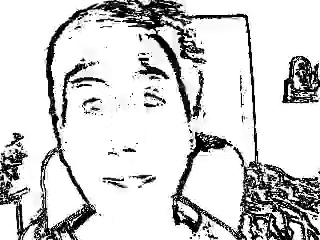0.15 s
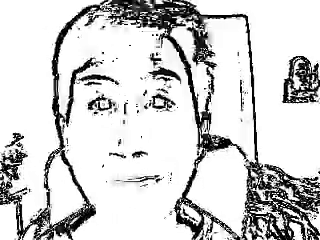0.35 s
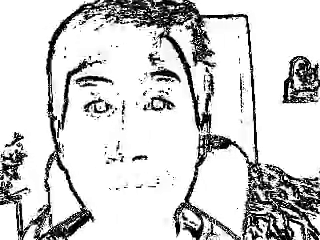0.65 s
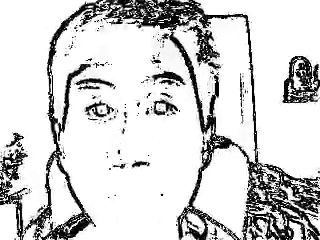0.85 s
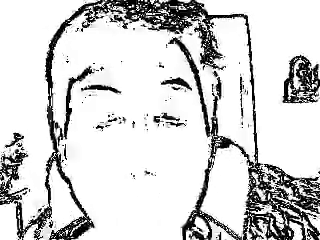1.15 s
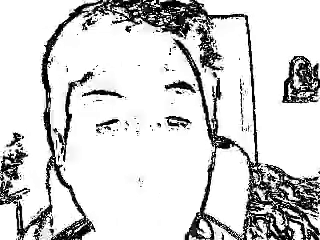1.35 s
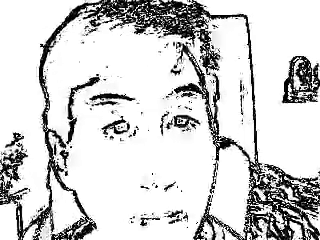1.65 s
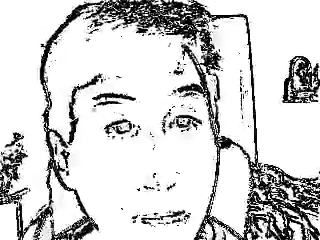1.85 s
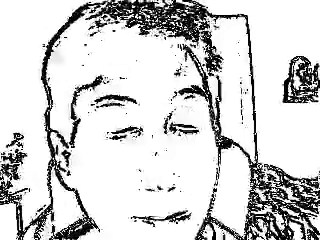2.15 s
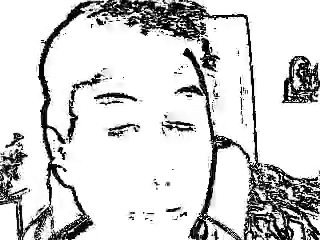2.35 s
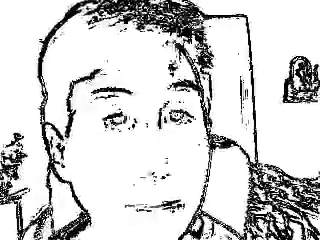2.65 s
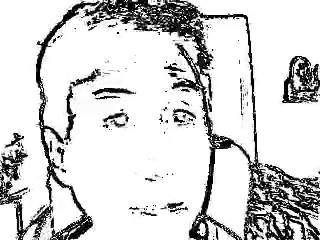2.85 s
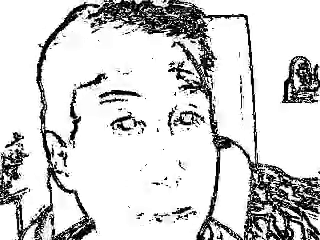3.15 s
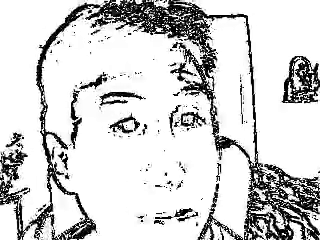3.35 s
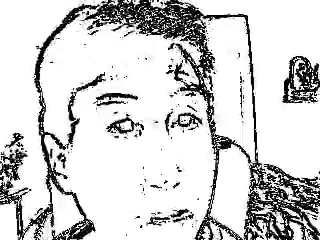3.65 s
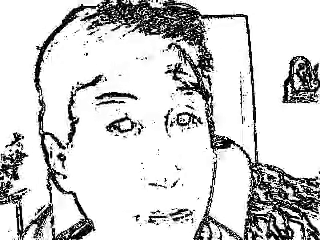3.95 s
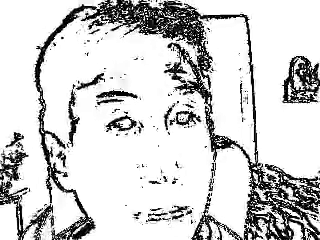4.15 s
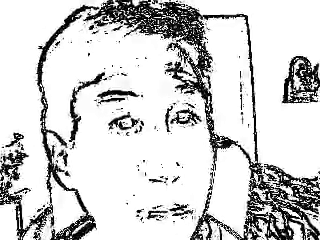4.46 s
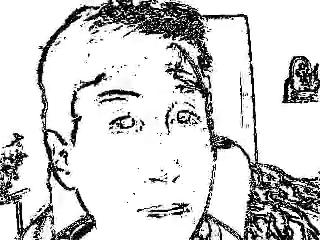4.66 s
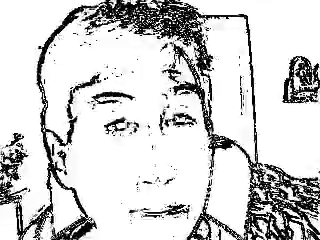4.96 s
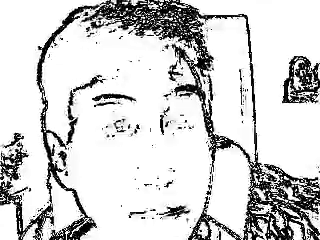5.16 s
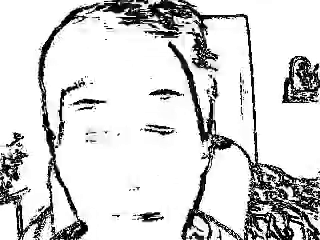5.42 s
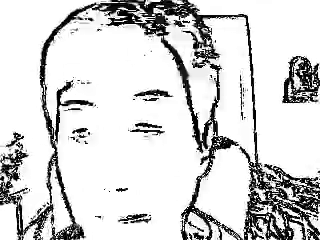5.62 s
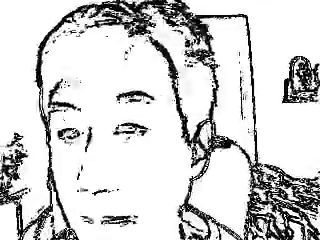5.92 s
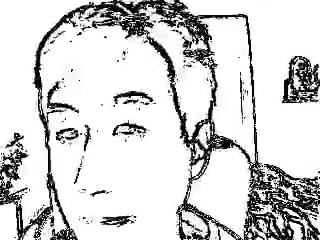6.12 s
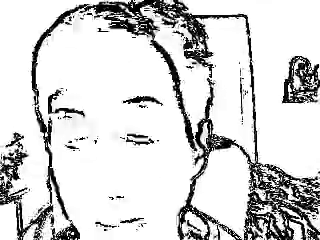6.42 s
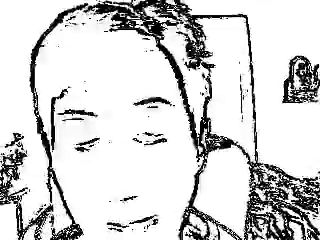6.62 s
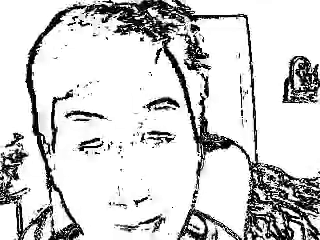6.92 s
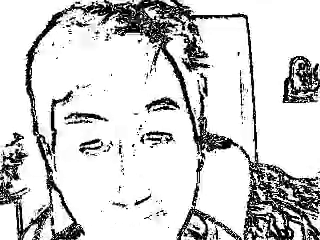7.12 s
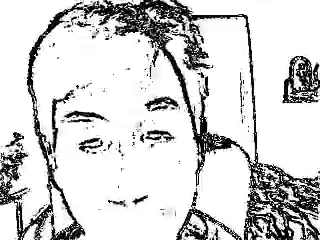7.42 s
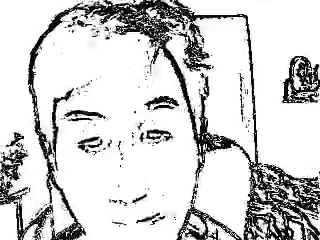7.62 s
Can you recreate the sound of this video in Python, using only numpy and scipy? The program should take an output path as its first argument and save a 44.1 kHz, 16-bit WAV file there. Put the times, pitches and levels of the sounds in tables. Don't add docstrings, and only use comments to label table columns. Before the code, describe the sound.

A computer's small fan hums deep and steady, almost a pure low tone, with a thin constant whine above it and soft air rushing through vents. Faint cloth rubs and tiny taps open the scene; a hard dry knock comes soon after, a hollow snap later, and a thin click near the end. Quiet small room, heard very close through the computer's own slightly dull microphone.

```python
import sys
import numpy as np
from scipy import signal
from scipy.fft import rfft, irfft, next_fast_len
from scipy.io import wavfile

SR = 44100
rng = np.random.default_rng(int(sys.argv[2]) if len(sys.argv) > 2 else 0)


def invert_db(level):
    return 10 ** (np.asarray(level, dtype=float) / 20)


def to_wav(s):
    ch = np.atleast_2d(s).T
    pcm = np.round(np.clip(ch, -1, 1) * 32767)
    wavfile.write(sys.argv[1], SR, pcm.astype(np.int16))


N = 343274
TIME_S = np.arange(N) / SR
SIZE = next_fast_len(N)
HZ = np.fft.rfftfreq(SIZE, 1 / SR)


def evened(x):
    return x / np.sqrt(np.mean(x ** 2) + 1e-20)


def along(rows):
    s, value = np.transpose(rows)
    return np.interp(TIME_S, s, value)


def across(points):
    hz, value = np.transpose(points)
    return np.interp(np.log(HZ + 1), np.log(hz + 1), value)


def wander(top_hz):
    count, rate_hz = 2048, 200
    steps = rng.standard_normal(count)
    hz = np.fft.rfftfreq(count, 1 / rate_hz)
    smoothing = (hz > 0) / (1 + (hz / top_hz) ** 2)
    slow = evened(irfft(rfft(steps) * smoothing))
    return np.interp(TIME_S, np.arange(count) / rate_hz, slow)


def coloured(db_per_hz):
    white = rfft(rng.standard_normal(SIZE))
    return irfft(white * invert_db(db_per_hz) * np.sqrt(SR / 2), SIZE)[:N]


def add(mix, start_s, sound):
    part = mix[round(start_s * SR):][:len(sound)]
    part += sound[:len(part)]


def tone(turns, level_db):
    return np.sqrt(2) * invert_db(level_db) * np.sin(2 * np.pi * turns)


def overtones(turns, orders, waver_hz):
    out = np.zeros(N)
    for multiple, level_db, waver_db in orders:
        phase = round(multiple) * turns + rng.random()
        out += tone(phase, level_db + waver_db * wander(waver_hz))
    return out


# time_s, speed_hz (turns a second)
FAN_SPEED = [(0, 100.21), (1.55, 100.18), (1.9, 100.35), (3.0, 100.39), (4.7, 100.56), (6.3, 100.43),
             (7.78, 100.56)]
# multiple, level_db, waver_db
FAN_OVERTONES = [(2, -53.5, -0.55), (3, -66, 2), (4, -71, 2.5), (5, -69.5, 3), (7, -72, 2.5),
                 (8, -66.5, -0.5), (9, -56.5, 0.7)]
# centre_s, half_length_s, depth_db
SHAKE_SLUMPS = [
    (0, .13, 4),
    (.18, .06, 2),
    (1.79, .11, 1.5),
]


def fan():
    turns = np.cumsum(along(FAN_SPEED) + 0.019 * wander(1.7)) / SR
    slump_db = np.zeros(N)
    for centre_s, half_s, depth_db in SHAKE_SLUMPS:
        slump_db += depth_db * np.maximum(1 - abs(TIME_S - centre_s) / half_s, 0)
    shake = tone(turns, -33 - slump_db + 0.17 * wander(20))
    return shake + overtones(turns, FAN_OVERTONES, waver_hz=6.1)


# time_s, whine_hz
WHINE_PITCH = [(0, 1320.9), (1, 1319.95), (2.3, 1319.4), (3.5, 1321.2), (4.3, 1321.9), (5.1, 1320.7),
               (6.2, 1322.1), (6.8, 1321.2), (7.78, 1321.35)]
# multiple, level_db, waver_db
WHINE_OVERTONES = [(1, -51.5, 0.2), (2, -69, 1.4), (4, -98, -6), (5, -95, 5.5)]


def whine():
    turns = np.cumsum(along(WHINE_PITCH) + 0.5 * wander(5.2)) / SR
    return overtones(turns, WHINE_OVERTONES, waver_hz=13)


def struck(parts, rise_ms, start_s, hit_db=0, pitch=1, ring=1, tilt_db=0):
    ms = np.arange(2000) / SR * 1000
    hz, db, t60_ms = np.transpose(parts)[:, :, None]
    direction = np.where((hz > 2400) & (hz < 4000), 1, -1)
    decay_db = 60 * ms / (ring * t60_ms)
    level_db = hit_db + db + tilt_db * np.log2(hz / hz[0]) - decay_db
    modes = direction * invert_db(level_db) * np.sin(2 * np.pi * pitch * hz * ms / 1000)
    out = np.zeros(N)
    add(out, start_s, modes.sum(0) * np.minimum(ms / rise_ms, 1))
    return out


# pitch_hz, level_db, t60_ms
KNOCK_PARTS = [(1400, -33, 16), (1690, -21, 4.7), (2880, -20.5, 14), (3770, -20, 1.6), (5570, -36, 5.5)]
# pitch_hz, level_db, t60_ms
SNAP_PARTS = [(1570, -20, 8.3), (2810, -13, 2.1), (3650, -37, 10.5), (4600, -18, 1.6), (7200, -40, 1.5)]
# pitch_hz, level_db, t60_ms
CLICK_PARTS = [(1655, -26, 13), (3000, -25.5, 3.6), (3430, -41, 12), (4750, -34, 2.6), (6000, -40, 3),
               (6650, -40, 5)]
# start_s, strength_db, pitch_ratio, ring_ratio, tilt_db (per octave)
KNOCK_HITS = [
    (.2546, -24, 1, 1.4, 0),
    (.3392, -26, .89, 1.1, 0),
    (1.19717, -15, .96, .65, 4),
    (1.20347, 0, 1, 1, 0),
]
# delay_s, level_db
NEAR_ECHOES = [
    (.0095, -28),
    (.0125, -29),
]


def ticks():
    hits = sum(struck(KNOCK_PARTS, 0.6, *row) for row in KNOCK_HITS)
    hits = hits + struck(SNAP_PARTS, rise_ms=0.6, start_s=2.96433)
    hits = hits + struck(CLICK_PARTS, rise_ms=0.25, start_s=7.44121)
    tail_t60_s = 0.07
    room = invert_db(-35.5 - 60 * np.arange(6000) / SR / tail_t60_s) * rng.standard_normal(6000)
    room[0] = 1
    for delay_s, level_db in NEAR_ECHOES:
        room[round(delay_s * SR)] += invert_db(level_db)
    in_room = signal.oaconvolve(hits, room)[:N]
    dulled = signal.sosfilt(signal.butter(4, 7000, fs=SR, output="sos"), in_room)
    return signal.sosfiltfilt(signal.butter(3, 950, "high", fs=SR, output="sos"), dulled)


# centre_s, half_length_s, pitch_hz, width_hz, level_db
CLOTH_RUBS = [
    (0.1, 0.076, 4280, 450, -65),
    (0.104, 0.068, 6300, 2500, -68.5),
    (0.297, 0.33, 2800, 1500, -67),
    (.3, 0.41, 5000, 2500, -75),
    (2.112, .05, 4600, 2000, -68),
    (2.45, .05, 6000, 2500, -73),
]


def rustles():
    out = np.zeros(N)
    for centre_s, half_s, hz, width_hz, level_db in CLOTH_RUBS:
        size = round(2 * half_s * SR)
        edges_hz = [hz - width_hz / 2, hz + width_hz / 2]
        band = signal.butter(2, edges_hz, "bandpass", fs=SR, output="sos")
        rub = evened(signal.sosfilt(band, rng.standard_normal(SR)))[:size]
        add(out, max(centre_s - half_s, 0), invert_db(level_db) * rub * np.hanning(size))
    return out


# pitch_hz, level_db (per Hz)
AIR_RUSH = [(4, -62), (24, -66.5), (40, -71), (70, -78.5), (260, -81.5), (450, -85), (900, -83.5),
            (1600, -83.5), (2400, -90.5), (3400, -94.5), (3850, -102.5), (6000, -104.5), (7200, -112),
            (16000, -122)]
# centre_hz, width_hz, lift_db
DUCT_RESONANCES = [(37, 6.6, 6), (48, 4, 9), (90, 2, 9), (174.5, 24, 6), (234.5, 11, 5.5), (396, 20, 1.5),
                   (574, 31, 5.5), (1175, 40, 2.5), (1180, 440, 5), (1548, 120, -5), (1530, 6, 7),
                   (1555, 5, 10), (3600, 110, -1.5), (4870, 100, 4.5)]


def air():
    lift_db = np.zeros(len(HZ))
    for centre_hz, width_hz, db in DUCT_RESONANCES:
        lift_db += db / (1 + (2 * (HZ - centre_hz) / width_hz) ** 2)
    comb = abs(1 + 0.2 * np.exp(-2j * np.pi * HZ * 0.0112))
    lift_db += 20 * np.log10(comb)
    return coloured(across(AIR_RUSH) + lift_db) * invert_db(0.2 * wander(2))


def mains():
    return tone(60 * TIME_S, -49.5 + 0.6 * wander(1))


def drone():
    start_s, rise_s = 4.6, 1
    swell = np.clip((TIME_S - start_s) / rise_s, 0, 1)
    turns = np.cumsum(46.5 + 0.23 * wander(1)) / SR
    return swell * tone(turns, -56 + 0.8 * wander(2))


def scene():
    machine = fan() + whine()
    close_by = ticks() + rustles()
    background = air() + mains() + drone()
    return np.tile(machine + close_by + background, (2, 1))


def top_cut(x):
    return signal.sosfilt(signal.butter(12, 15750, fs=SR, output="sos"), x)


def record(dry):
    corner_hz = 300
    hiss_db = -109 + 10 * np.log10(1 + corner_hz / (HZ + 40))
    mixed = dry + np.array([coloured(hiss_db), coloured(hiss_db)])
    limited = irfft(rfft(mixed, SIZE) * (HZ < 15750), SIZE)[:, :N]
    return top_cut(limited)


dry = scene()
out = record(dry)
to_wav(out)
```